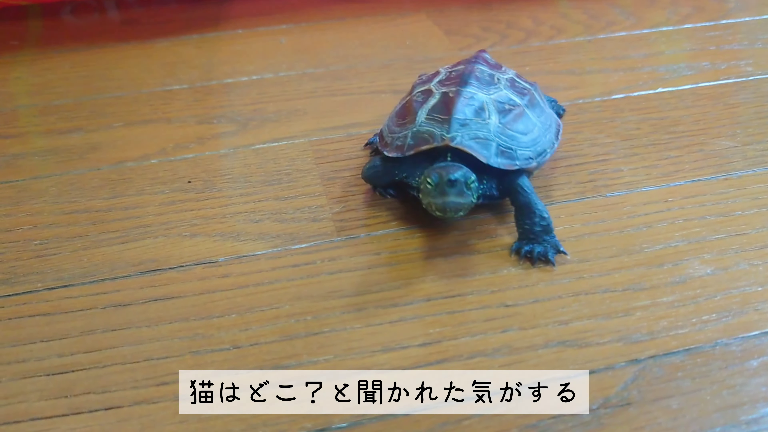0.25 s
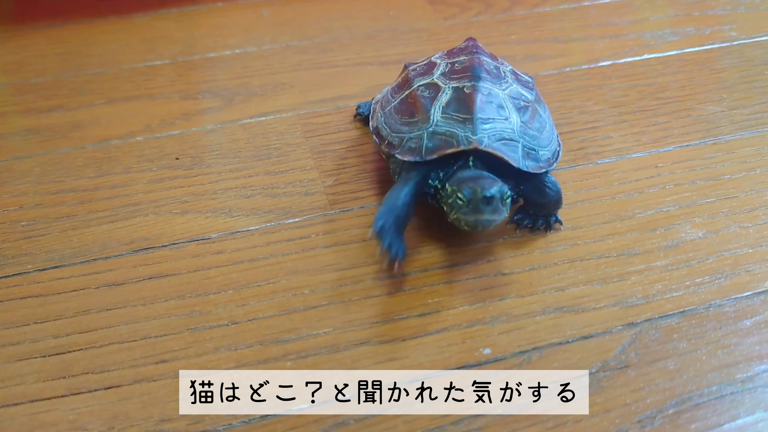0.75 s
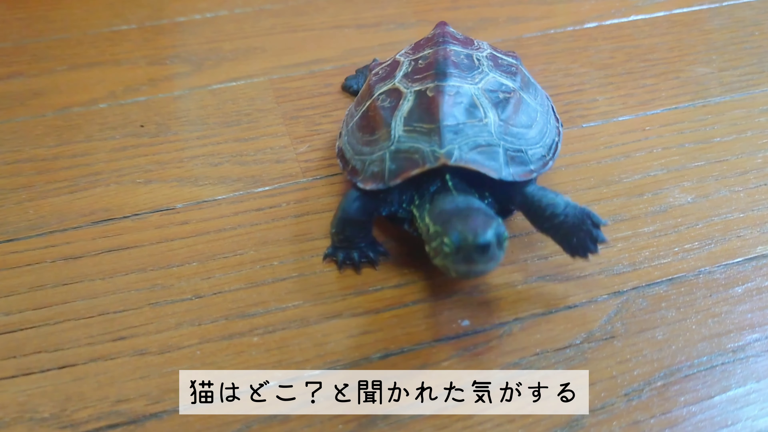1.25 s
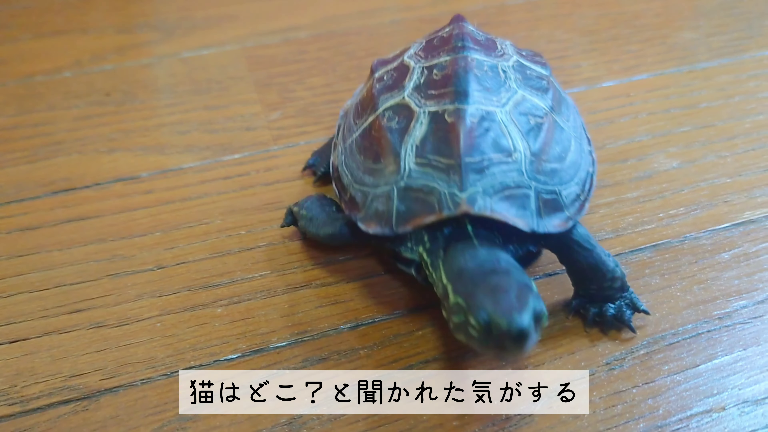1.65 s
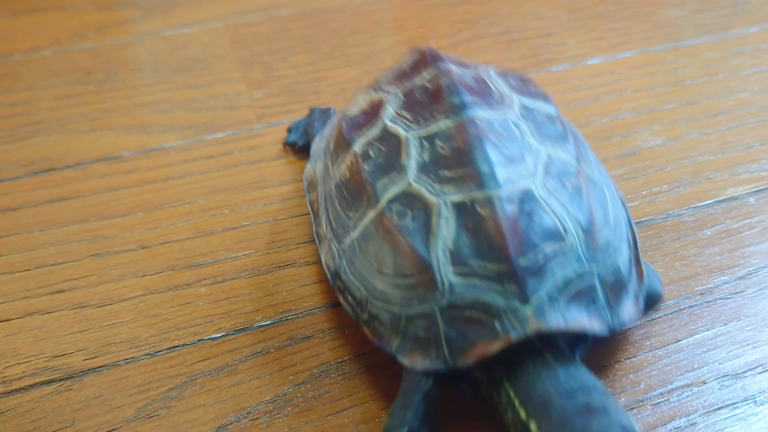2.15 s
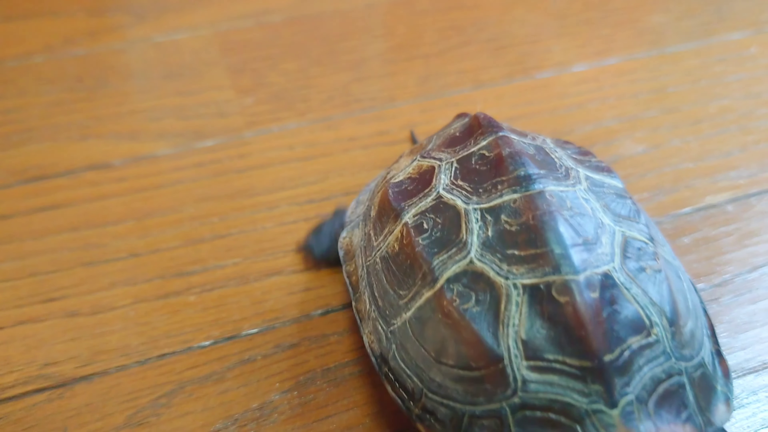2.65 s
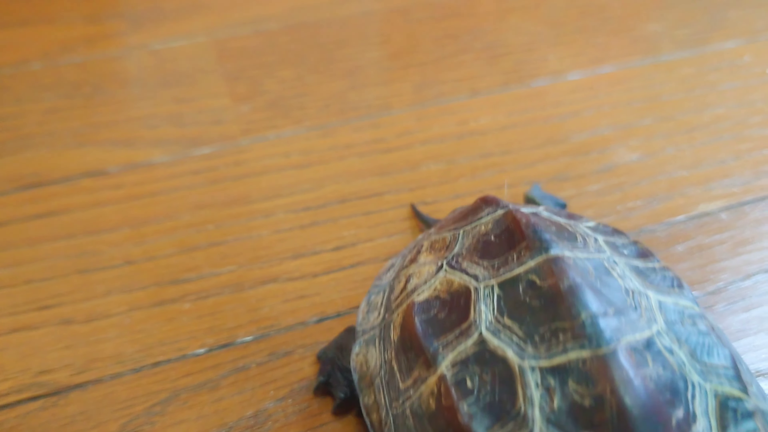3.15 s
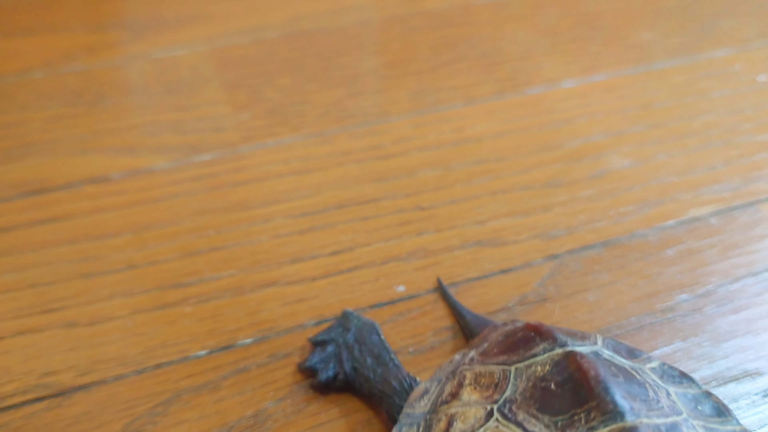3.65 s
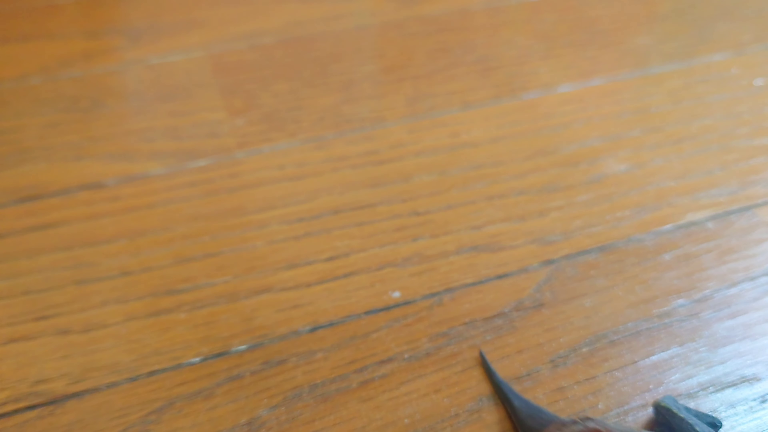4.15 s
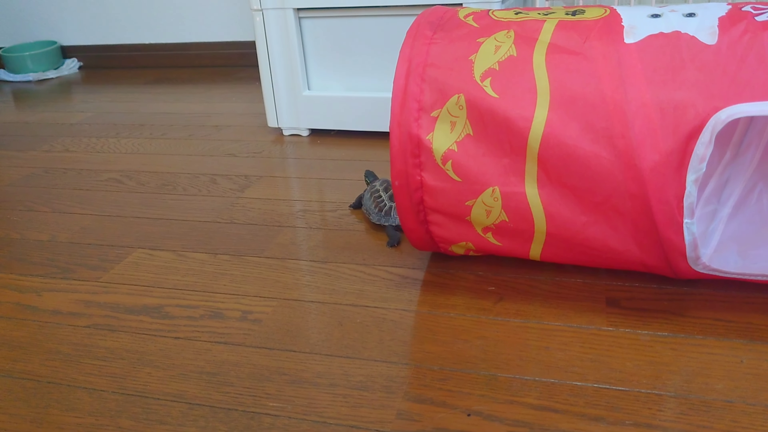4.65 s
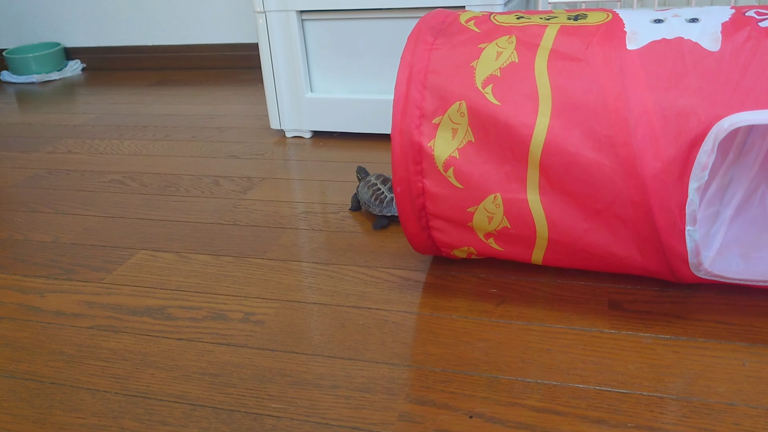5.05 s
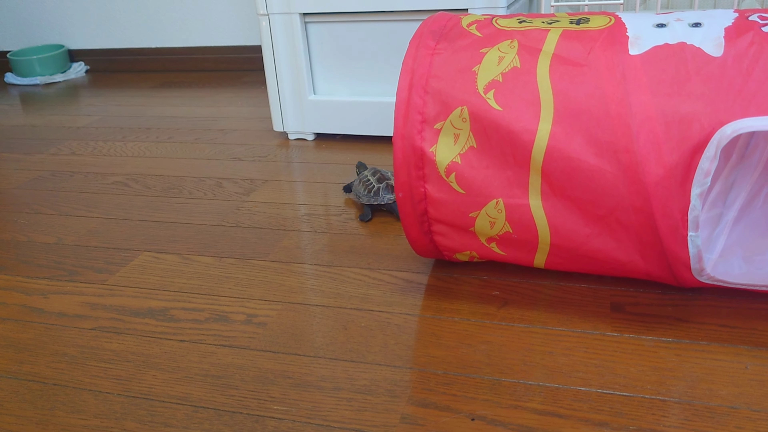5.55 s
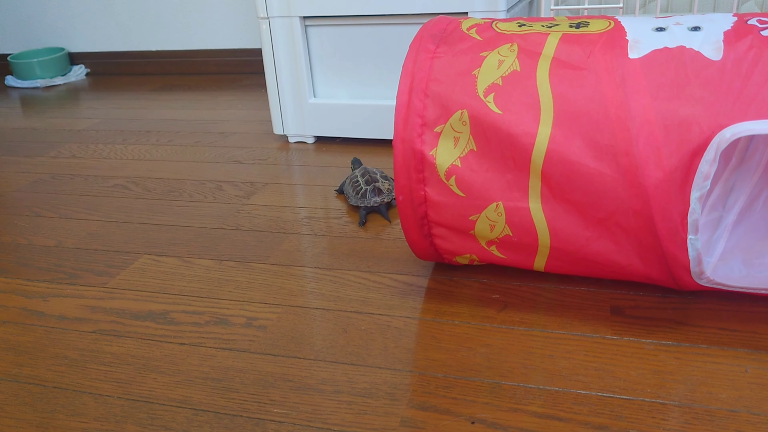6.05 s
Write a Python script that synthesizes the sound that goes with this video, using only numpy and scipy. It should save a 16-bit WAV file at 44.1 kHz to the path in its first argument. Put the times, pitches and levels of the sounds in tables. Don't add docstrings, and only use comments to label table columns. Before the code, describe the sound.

Close stereo microphone on a wooden floor: crisp, irregular claw clicks and little scratchy drags from a walking turtle, over soft hiss, low hum and thin camera motor whine. A busy scuffle with woody thumps comes before a short total silence. Then the same animal is heard across the room, duller ticks, rubbing shell and sharp resonant knocks, with faint low rumble beneath.

```python
import sys
import numpy as np
from scipy import signal
from scipy.fft import rfft, irfft, next_fast_len
from scipy.io import wavfile
from scipy.ndimage import uniform_filter1d, map_coordinates

SR = 44100
rng = np.random.default_rng(int(sys.argv[2]) if len(sys.argv) > 2 else 0)


def store_pcm(level_fs):
    pcm = np.round(np.clip(level_fs, -1, 1) * 32767).astype(np.int16)
    wavfile.write(sys.argv[1], SR, np.atleast_2d(pcm).T)


def boost(x):
    u = np.asarray(x, float) / 20
    return 10 ** u


N = 278071
TIME = np.arange(N) / SR
MAINS_HZ = 60


def unit(x):
    return x / np.sqrt(np.mean(x ** 2) + 1e-20)


def along(points, hz):
    f, *values = np.transpose(points)
    return np.array([np.interp(np.log(hz + 1), np.log(f + 1), v) for v in values])


def curves(rows):
    s, *columns = np.transpose(rows)
    return [np.interp(TIME, s, column) for column in columns]


def wobble(rate):
    knots = rng.standard_normal(int(N * rate / SR) + 4)
    return map_coordinates(knots, [np.arange(N) * rate / SR])


def noise():
    return rng.standard_normal(N)


def filtered(x, response):
    m = next_fast_len(N + 8192)
    return irfft(rfft(x, m) * response(np.fft.rfftfreq(m, 1 / SR)), m)[..., :N]


def band(x, lo_hz, hi_hz):
    return signal.sosfilt(signal.butter(3, [lo_hz, hi_hz], "band", fs=SR, output="sos"), x)


def strokes(rows):
    gain = np.zeros(N)
    for start, end, db in rows:
        u = np.clip((TIME - start) / (end - start), 0, 1)
        gain += boost(db) * np.minimum(u / 0.11, 1) * (1 - u ** 3)
    return gain


# (from t/s, to t/s)
SILENCE = (4.1535, 4.374)


def silence_gate():
    fade_in = np.clip((TIME - SILENCE[1]) / .024, 0, 1) ** 1.5
    return np.where(TIME < SILENCE[0], 1, fade_in)


# (f/Hz, likeness from -1 to 1)
LIKENESS = [(60, 0.99), (200, 0.16), (350, 0.66), (600, -0.4), (1400, -0.056), (2800, -0.078)]


def air(spectrum, patchy_db):
    z = signal.stft(rng.standard_normal((2, N)), nperseg=512)[2]
    field = uniform_filter1d(rng.standard_normal(z.shape[1:]), size=6, axis=0)
    field = uniform_filter1d(field, size=12, axis=1)
    a, b = signal.istft(z * boost(patchy_db * unit(field)), nperseg=512)[1][:, :N]

    def split(hz):
        angle = np.arccos(np.clip(along(LIKENESS, hz)[0], -1, 1)) / 2
        return np.array([np.cos(angle), np.sin(angle)])

    mid, side = filtered(np.array([a, b]), split)
    stereo = np.array([mid + side, mid - side])
    return filtered(stereo, lambda hz: boost(along(spectrum, hz)) * np.sqrt(SR / 2))


# (f/Hz, left level/dB per Hz, right level/dB per Hz)
NEAR_AIR = [(25, -102, -106), (79, -100.5, -96.5), (184, -94, -86.5), (369, -100, -94.5), (500, -102, -96),
            (1097, -93.5, -92), (1530, -99, -99), (2320, -99, -100), (3650, -119, -102), (3860, -111, -103),
            (5440, -123, -112), (8700, -118, -107), (9600, -124, -114), (15500, -133, -114)]
# (f/Hz, left level/dB per Hz, right level/dB per Hz)
FAR_AIR = [(25, -88, -116), (80, -89.5, -85.5), (223, -94.5, -87), (340, -101, -94), (554, -96, -97.5),
           (890, -96.5, -87), (1500, -103, -95.5), (2100, -109, -99), (3200, -115, -105),
           (4500, -117, -108), (5800, -123, -114), (8700, -118, -109), (10200, -125, -116),
           (15500, -137, -119)]
# (t/s, level/dB)
DRIFT = [
    (0, 1.2),
    (.6, -0.2),
    (3.9, 0),
    (4.15, -2),
    (4.38, -2.5),
    (4.6, 1),
    (5.3, -0.46),
    (6.31, 0.7),
]


def room_air():
    near, far = air(NEAR_AIR, patchy_db=1.17), air(FAR_AIR, patchy_db=1.53)
    return np.where(TIME > SILENCE[0], far, near) * boost(curves(DRIFT)[0] + 0.45 * wobble(5.6))


# (multiple of mains pitch, left level/dB, right level/dB)
HUM = [(1, -73, -84), (2, -78.5, -67), (3, -72, -63), (4, -73.5, -64.5), (6, -84.5, -76.5)]


def mains_hum():
    hum = np.zeros((2, N))
    for k, left, right in HUM:
        far_loss_db = 0 if k == 4 else 4.4
        level_db = np.array([[left], [right]]) - 2.0 + 2.3 * wobble(10) - far_loss_db * (TIME > SILENCE[0])
        sway = (0.4 if k == 4 else 1.6) * wobble(8)
        hum += boost(level_db) * np.sin(2 * np.pi * k * MAINS_HZ * TIME + k * k + sway)
    return hum


# (t/s, peak level/dB, half width t/s)
SWELLS = [
    (4.69, -56, 0.034),
    (4.92, -55, 0.041),
    (5.16, -58.5, 0.05),
    (5.37, -57, 0.022),
    (5.63, -45, 0.031),
    (5.86, -50, 0.033),
    (6.05, -58.5, 0.093),
    (6.31, -52, 0.025),
]


def far_rumble():
    swells = boost(-88) * (TIME > SILENCE[0])
    for s, db, width in SWELLS:
        swells = swells + boost(db) * np.exp(-((TIME - s) / width) ** 2 / 2)
    return swells * boost(-5.0 + 2.0 * wobble(2.78)) * unit(band(noise(), lo_hz=63.9, hi_hz=77.2))


def motor_ticks():
    far = TIME > SILENCE[0]
    cycle = (TIME - np.where(far, .0108, .0142)) * MAINS_HZ
    size_db = rng.normal(0, .9, N // 600)[cycle.astype(int)]
    fade_db = -60 * (cycle % 1) / MAINS_HZ / .012
    beat = boost(size_db + fade_db + np.where(far, -63.5, -73))
    return beat * unit(band(noise(), lo_hz=7700, hi_hz=9500)) * boost([[-14], [0]])


# (start t/s, end t/s, f/Hz,
# width f/Hz, level/dB)
WHISTLES = [
    (0, 4.03, 3500, 340, -85.5),
    (1, 4.4, 1700, 260, -79),
    (5, 5.6, 2180, 190, -80),
    (2.5, 7.3, 7980, 36, -90),
    (0, 0.52, 11500, 900, -80),
]


def whines():
    out = np.zeros(N)
    for start, end, hz, width, db in WHISTLES:
        on = uniform_filter1d(((TIME > start) & (TIME < end)) * 1., size=4000)
        out += on * boost(db + 3.2 * wobble(3.8)) * unit(band(noise(), hz - width / 2, hz + width / 2))
    return out * boost([[-10], [3]])


# (f/Hz, time to fade 60 dB t/s)
ROOM_FADE = [(200, 0.21), (500, 0.23), (1500, 0.17), (5000, 0.17), (12000, 0.088)]


def tail(length=12000):
    hz, t, z = signal.stft(rng.standard_normal((2, length)), SR, nperseg=256)
    fading = z * boost(-60 * t / along(ROOM_FADE, hz).T)
    answer = signal.istft(fading, SR, nperseg=256)[1][:, :length]
    answer[1] += .5 * answer[0]
    return answer / np.linalg.norm(answer, axis=1, keepdims=True)


# (start t/s, end t/s, level/dB)
SLIDES = [
    (1.796, 1.853, -65.5),
    (3.556, 3.585, -55.5),
    (3.585, 3.628, -50.5),
    (3.693, 3.73, -59),
    (4.505, 4.66, -83),
    (5.332, 5.42, -63.5),
    (5.787, 5.877, -63.5),
    (5.857, 5.96, -62),
    (6.05, 6.189, -63),
    (6.188, 6.274, -64),
]


def groan():
    rub = boost(1.5 * wobble(70)) * noise()
    low = unit(band(rub, lo_hz=380, hi_hz=533))
    high = unit(band(rub, lo_hz=900, hi_hz=1150))
    return strokes(SLIDES) * (low + boost(-4.0) * high) * boost([[-1.5], [1.5]])


# (t/s, peak level/dB, main f/Hz, main 60 dB fade t/s, overtone level/dB)
KNOCKS = [(.637, -59, 400, 0.028, -2), (1.8227, -62, 1800, 0.06, -3), (2.386, -66, 412, 0.02, 16),
          (3.5525, -34, 438, 0.025, -2.5), (3.592, -61, 477, 0.019, 2.5), (3.613, -65, 455, 0.027, 14),
          (3.72, -28.5, 333, 0.0076, -3), (3.7344, -45, 407, 0.028, -16), (3.741, -59, 380, .0088, -18),
          (4.558, -46.5, 396, 0.013, 2.5), (4.6965, -42, 390, .015, -2), (5.3756, -13.5, 440, 0.017, -0.5),
          (5.735, -55.5, 424, 0.019, -6), (5.8484, -19, 470, 0.019, -19), (5.9182, -27, 409, 0.022, -16),
          (5.9225, -31.5, 444, 0.016, -23), (5.965, -48.5, 416, 0.034, -4)]
# (f/Hz, right level/dB, left level/dB, 60 dB fade t/s)
NEAR_BOARDS = [(215, -2.5, -4, 0.058), (613, -13, -23.5, 0.073), (976, 3.5, -15.5, 0.03),
               (1175, -14.5, -8, 0.032), (1760, -8, -13, 0.021), (2530, -21, -22.5, 0.048)]
# (f/Hz, right level/dB, left level/dB, 60 dB fade t/s)
FAR_BOARDS = [(304, -19.5, -24.5, 0.11), (568, -6.5, -10, 0.048), (728, -11, -10, 0.034),
              (840, -2.5, -16, 0.029), (1163, -13, -22, 0.042), (1235, -2.5, -17, 0.03),
              (1473, -6.5, -18.5, 0.03), (1637, -12, -25, .04), (1780, -15, -31, 0.029),
              (2160, -29, -36, 0.029), (4000, -12.5, -23, 0.0093)]
# (delay t/s, left level/dB, right level/dB)
WALLS = [(.0018, -1, -12.5), (.004, 1, -3.5), (.0068, -16, -4), (0.0115, -2, -4), (0.0225, -31, -10.5),
         (.0255, -30, -10), (0.0317, -8.5, -17), (0.0324, -30, -14), (0.0373, -18, -28),
         (.0455, -28, -19.5), (.0518, -35, -26), (0.053, -24, -24), (0.0542, -22, -35), (0.0592, -34, -20)]
ROOM_DB, ROOM_PER_HARDNESS = -3.5, 0.091


def shell():
    out, t = np.zeros((2, N + SR)), np.arange(9000) / SR
    for s, db, hz, t60, over_db in KNOCKS:
        far = s > SILENCE[0]
        side_db = np.array([[-2 - 5 * far], [1 - 3.6 * far]])
        ring = boost(side_db - 60 * t / t60) * np.sin(2 * np.pi * hz * t) * (1 - np.exp(-t / 0.00045))
        for mode_hz, right, left, life in FAR_BOARDS if far else NEAR_BOARDS:
            strength = over_db + np.array([[left], [right]]) + rng.normal(0, 1.2, (2, 1))
            onset = 1 - np.exp(-t * mode_hz / 1.1)
            fade_db = -60 * t / (life * (0.18 + t60 / 0.065))
            ring = ring - onset * boost(strength + fade_db) * np.sin(2 * np.pi * mode_hz * t)
        ring = band(ring, 240 if far else 140, hi_hz=5700)
        swell = 1 - np.exp(-(np.arange(12000) / SR / (.03 if far else .0092)) ** 2)
        echo = signal.fftconvolve(ring.mean(axis=0)[None], swell * tail(), axes=1)
        echo *= boost(ROOM_DB + ROOM_PER_HARDNESS * over_db)
        start = round(s * SR)
        out[:, start:start + len(t)] += boost(db + 6.5) * ring
        out[:, start:start + echo.shape[1]] += boost(db + 5.5) * echo
        dull = band(ring, lo_hz=125, hi_hz=1000)
        bright = band(ring, lo_hz=940, hi_hz=2510)
        for delay, left, right in WALLS if far else []:
            bounce = dull + np.exp(-delay / 0.0093) * bright
            first = start + round(delay * SR)
            out[:, first:first + len(t)] += boost(db + 7.0 + np.array([[left], [right]])) * bounce
    return out[:, :N]


# (t/s, level/dB, sharpness level/dB, weight level/dB)
CLAWS = [(.3234, -50, 5.5, -23), (.3293, -47, 1, -22), (.6654, -34.5, 5, -35), (1.0755, -38, -0.5, -24),
         (1.1281, -41.5, -4.5, -27), (1.1341, -51, 5.5, -3), (1.6699, -41, -4.5, -13),
         (1.6819, -41, -13, -24), (1.7305, -33, -5.5, -6), (1.7369, -38.5, 3, -12),
         (1.7646, -36.5, -2.5, -18), (1.7699, -44.5, -5, 1.5), (1.8213, -34.5, -5.5, -7),
         (2.245, -43, -4, -7), (2.3798, -41, -4.5, -12), (2.3885, -41.5, -15, -6),
         (3.3581, -44, -15.5, -8.5), (3.3768, -50, -5, 0.5), (3.5378, -40, -8.5, -20),
         (3.5407, -30.5, -8.5, -16), (3.5599, -41.5, -14.5, -4), (3.5847, -29, -16.5, -21),
         (3.5914, -35, -17.5, -12), (3.5947, -34.5, -17, -10), (3.5996, -35, -8.5, -12),
         (3.6096, -28.5, -10, -9.5), (3.6155, -42, -2.5, -1.5), (3.6377, -48.5, -1, -15.5),
         (3.6502, -39.5, -9, -8), (4.0833, -45, -8, -16)]
# (t/s, level/dB, weight level/dB)
DISTANT = [(4.4428, -55, -2), (4.5058, -48, -2.5), (4.5312, -41.5, -3.5), (4.552, -58, 10.5),
           (4.5756, -39.5, -12), (4.5923, -45, -6.5), (4.6559, -51.5, -7), (4.7647, -43, -8),
           (4.9928, -50, -5.5), (5.044, -49.5, -7), (5.345, -70, 7), (5.3552, -47, -13), (5.3722, -58, -5),
           (5.3754, -47, 11), (5.7355, -49, -4), (5.7912, -69, 0), (5.8025, -56, 3), (5.8154, -53.5, 4),
           (5.8308, -70, 20), (5.8484, -59.5, 15.5), (5.8755, -65, 13), (5.918, -75, 24), (5.946, -64, 5),
           (5.9658, -53.5, -28)]
# (t/s, level/dB, sharpness level/dB)
STEPS = [(.2923, -55, 3), (.3013, -58, 2), (.3083, -54, 0), (.3175, -53.5, 3), (.6776, -57, -2),
         (.7248, -58.5, 2), (.853, -55, -3), (.9159, -49.5, -8), (.9957, -50.5, -5), (1.0354, -52, -6),
         (1.0405, -68, -7), (1.1807, -61, -5), (1.2107, -66, 4), (1.2463, -63, 8), (1.2967, -58, 8),
         (1.304, -67, 7), (1.6868, -55, 0), (1.7008, -54, -2), (1.7123, -59.5, -3), (1.811, -57, -1.5),
         (1.8829, -47, -6), (2.0041, -58, -4), (2.0765, -50, -13), (2.2067, -61, -9), (2.2116, -51, -8),
         (2.2725, -53, -6), (2.3004, -50, -6.5), (2.3184, -50, -8), (2.3379, -49.5, -1), (2.342, -49.5, -1),
         (2.352, -50.5, -3), (2.357, -56.5, -5), (2.3738, -55, -8), (2.4012, -48, 1), (2.5489, -56, -6),
         (2.5903, -58, -2), (2.5998, -54, 0), (2.6247, -52.5, -3), (2.6295, -56, -1), (2.7355, -62.5, 2),
         (2.7609, -63, 0), (2.7669, -63, 3), (2.8848, -47, -11), (2.8903, -47.5, -11.5), (2.9083, -45, -10),
         (2.9302, -51, -6.5), (2.9991, -51, -6), (3.013, -48, -5), (3.0644, -54.5, -5), (3.0724, -50, -8),
         (3.0989, -49, -6), (3.1065, -55.5, -2.5), (3.1363, -47, -14), (3.3413, -51, -10.5),
         (3.3947, -57, 0.5), (3.4481, -48.5, -2), (3.8861, -55.5, 2), (3.9125, -53, -5), (4.125, -50, -10)]
# (t/s, level/dB, sharpness level/dB)
SCRAPE = [(3.4865, -60, -0.5), (3.506, -56, 1.5), (3.545, -50.5, -10.5), (3.5495, -47.5, -8),
          (3.555, -48, -12.5), (3.5874, -39.5, -12), (3.607, -43, -10), (3.6305, -49, -7.5),
          (3.6686, -50.5, -4), (3.678, -53.5, 1), (3.705, -50, -3), (3.7424, -55, -9)]
DISTANT_SHARP_DB = -9
TOE_SCATTER_DB, STEP_WEIGHT_DB, NEARING_DB_PER_S = 4.5, -16, 1.5


def taps():
    toes = np.vstack([STEPS, SCRAPE])
    scatter_db = TOE_SCATTER_DB * rng.standard_normal(len(toes))
    weight_db = STEP_WEIGHT_DB + NEARING_DB_PER_S * toes[:, 0] + scatter_db
    distant = np.insert(DISTANT, 2, DISTANT_SHARP_DB, axis=1)
    rows = np.vstack([CLAWS, distant, np.column_stack([toes, weight_db])])
    return np.column_stack([rows[:, :2], rows[:, 1:2] + rows[:, 2:]])


# (start t/s, end t/s, claw hiss level/dB, sharpness level/dB, skin rub level/dB)
DRAG = [(0.294, 0.372, -56, -3, -72), (.609, 0.647, -66, -14, -90), (0.66, .72, -67, 9, -84),
        (1.073, 1.153, -85, 6, -80), (1.27, 1.367, -87, 18, -76), (1.747, 1.81, -59, 2, -62),
        (1.803, 1.862, -68, 9, -60.5), (2.242, 2.31, -67, -4, -70), (2.323, 2.42, -62, -1, -67),
        (2.569, 2.64, -64, -1, -66), (2.728, 2.947, -94, -7, -107), (3.292, 3.436, -67, -11, -71),
        (3.536, 3.584, -51.5, -4, -57), (3.588, 3.623, -52, 1.5, -51.5), (3.622, 3.696, -56, 1, -56),
        (3.691, 3.739, -57.5, -2.5, -64), (4.51, 4.676, -63, 1.5, -68.5), (4.758, 4.803, -63, -4, -64.5),
        (5.338, 5.44, -67.5, 2, -60.5), (5.78, 5.874, -74, 8, -63.5), (5.848, 5.99, -83, 4, -66)]
# (low f/Hz, high f/Hz, 60 dB fade t/s, left port level/dB, gain level/dB)
COLOURS = [
    (7600, 9120, 0.0075, -27, -6),
    (10100, 14850, 0.0041, -19, 1.5),
    (1990, 5730, 0.013, -10.5, -5),
]
# (f/Hz, level/dB)
CLAW_TONE = [(1000, 21), (2400, 0.5), (3200, 1), (4200, 2), (5800, 0), (8300, -5.5), (10000, -1),
             (12000, -7), (14200, -6), (16000, 2.5)]


def claws():
    out, t, rows = np.zeros((2, N)), np.arange(700) / SR, taps()
    start, end, hiss_db, sharp_db, skin_db = np.transpose(DRAG)
    drag_db = (hiss_db, hiss_db + sharp_db, skin_db)
    at = np.round(rows[:, :1] * SR).astype(int) + np.arange(len(t))
    for k, (lo_hz, hi_hz, t60, left_db, gain_db) in enumerate(COLOURS):
        burst = .5 * rng.standard_normal(at.shape) * boost(-60 * t / t60)
        burst[:, 0] = 1
        opening = band(burst, lo_hz, hi_hz)[:, :40]
        burst /= np.sqrt(np.mean(opening ** 2, axis=1, keepdims=True))
        burst *= boost(rows[:, k + 1:k + 2] + gain_db)
        ticks = band(np.bincount(at.ravel(), burst.ravel(), N)[:N], lo_hz, hi_hz)
        grain = boost(3.2 * wobble(350) + 2 * wobble(60)) * rng.standard_normal((2, N))
        drag = strokes(zip(start, end, drag_db[k])) * unit(band(grain, lo_hz, hi_hz))
        left_ticks = np.where(np.arange(N) < SILENCE[0] * SR, np.roll(ticks, 21), ticks)
        out += boost([[left_db], [0]]) * (drag + np.array([left_ticks, ticks]))
    room = signal.fftconvolve(out[1:], tail(), axes=1)[:, :N]
    out += boost(-20) * room * boost([[-7], [0]])
    return filtered(out, lambda hz: boost(along(CLAW_TONE, hz)))


def scene():
    background = room_air() + mains_hum() + far_rumble() + motor_ticks()
    return background + whines() + groan() + shell() + claws()


def top_cut(x):
    return signal.sosfilt(signal.butter(12, 16820, fs=SR, output="sos"), x)


def record(dry):
    def ports(hz):
        dip = 1 + ((hz - 6900) / 400) ** 4
        steepness = np.where(hz < 6900, 0.32, 1)
        return (1 - 0.55 / dip ** steepness) * np.where(hz < 15900, 1, boost(-23.0))

    return top_cut(filtered(dry, ports) * silence_gate())


dry = scene()
out = record(dry)
store_pcm(out)
```